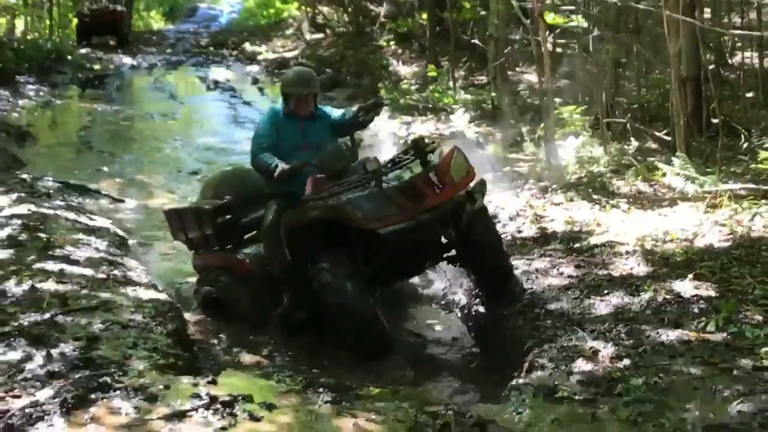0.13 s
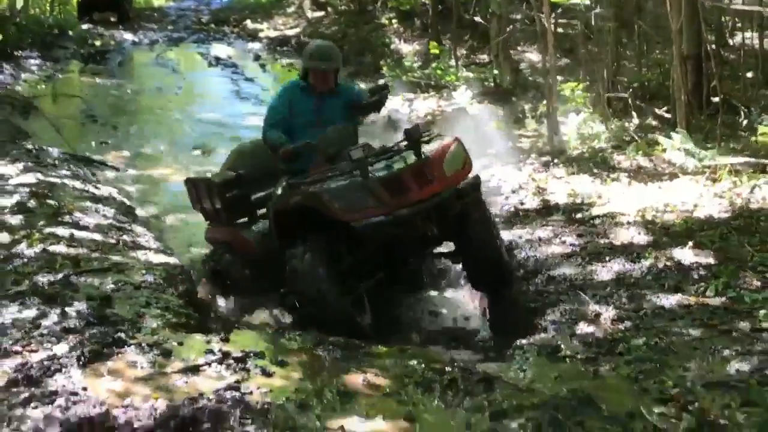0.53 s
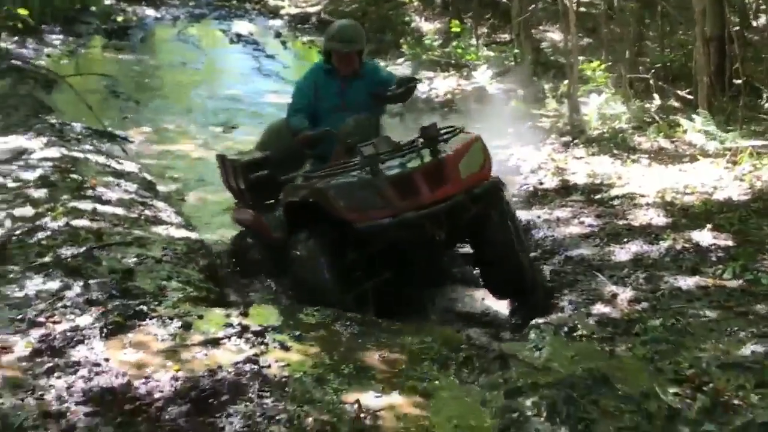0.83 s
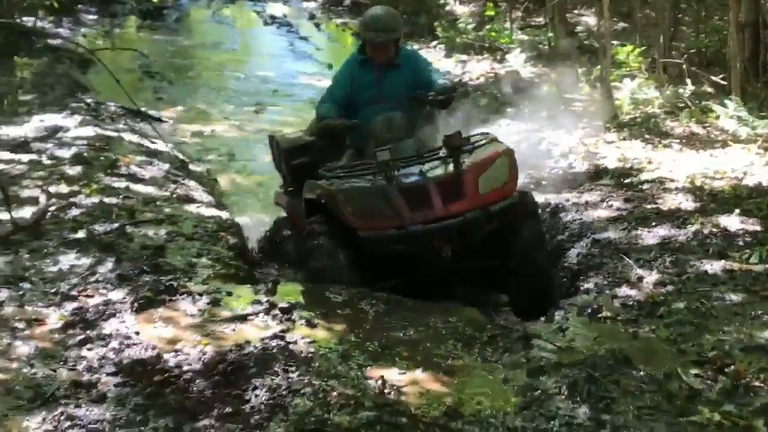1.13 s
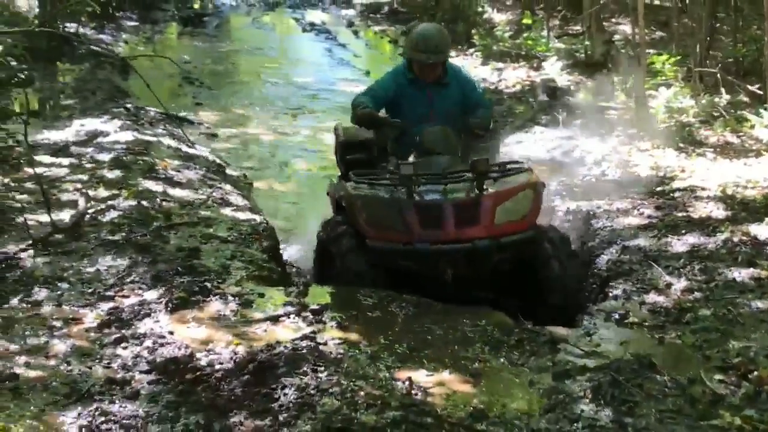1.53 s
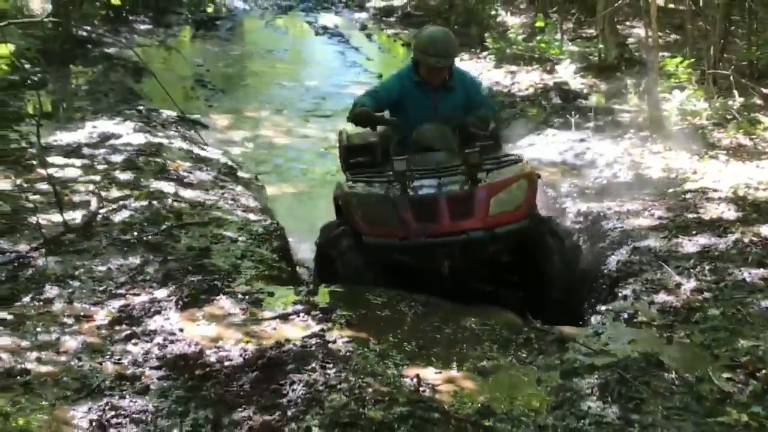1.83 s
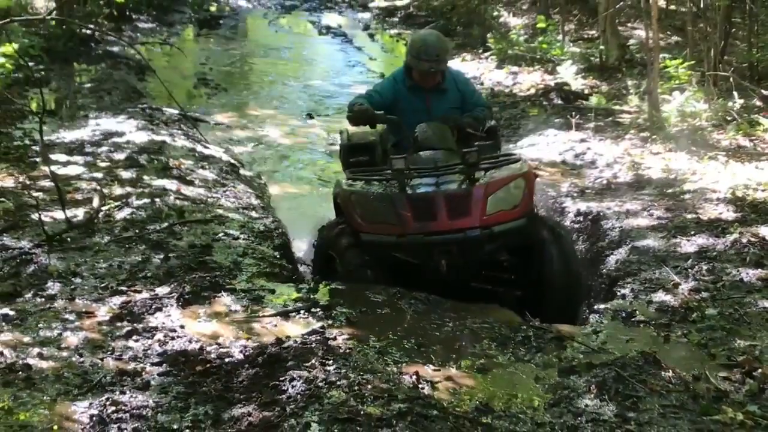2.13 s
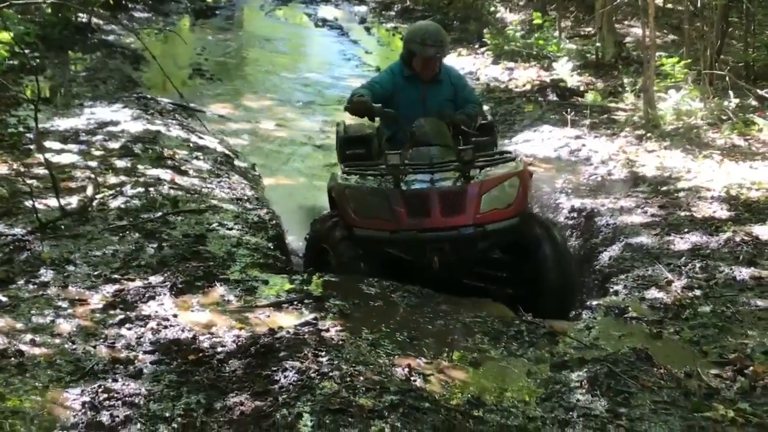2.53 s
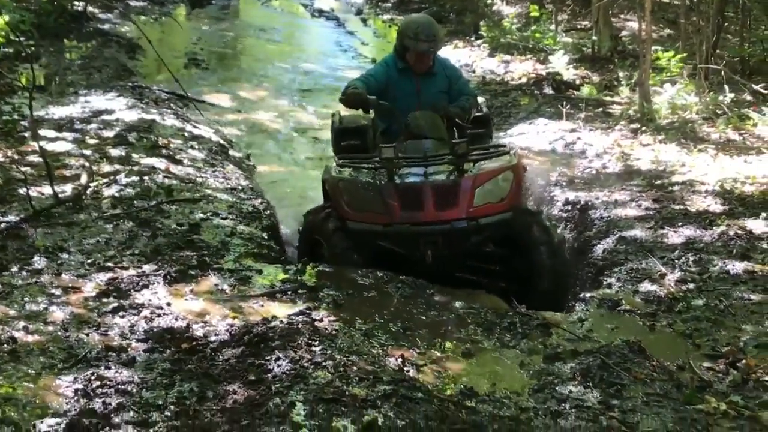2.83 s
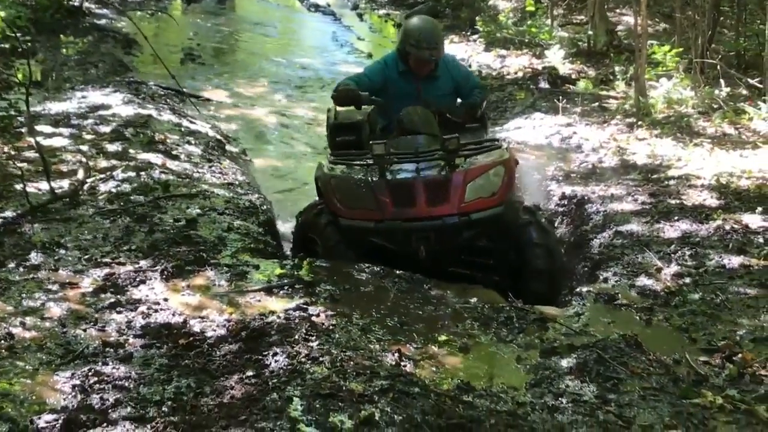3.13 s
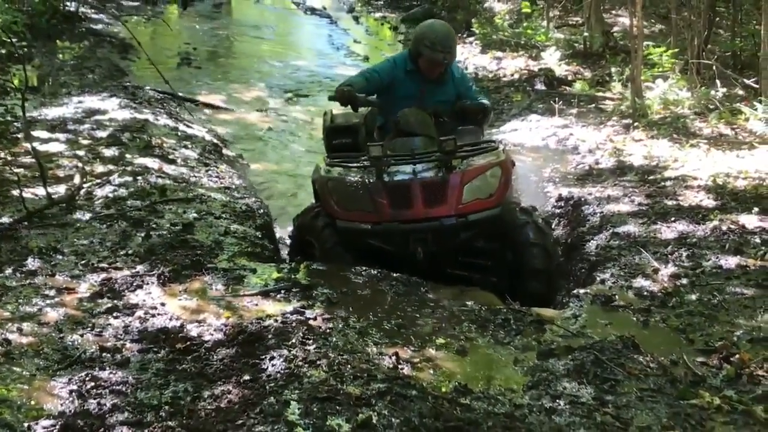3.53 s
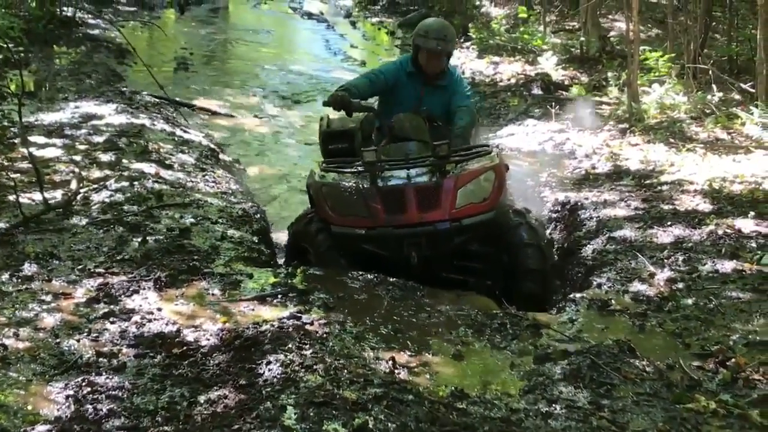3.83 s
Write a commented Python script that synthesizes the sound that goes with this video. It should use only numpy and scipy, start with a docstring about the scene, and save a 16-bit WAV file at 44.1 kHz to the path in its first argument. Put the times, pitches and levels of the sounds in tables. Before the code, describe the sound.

A quad bike engine labours low in mud, revs up once, then drops to a lumpy idle.

```python
"""In the woods, a single-cylinder quad bike labours out of a mud hole, revs up once and drops to a lumpy idle.
A steady note is built from harmonics of the firing rate, phase-shifted by the pipe's resonance.
Intake gulps and exhaust puffs excite damped modes: boom and bark, strongest at idle, and the air-box growl.
Noise puffs rasp above the growl; popping firings mark the idle. Filtered noise makes clatter and churned
water hiss, a few splashes of mud, and a low shudder of frame and mud."""
import sys
import numpy as np
from scipy import signal
from scipy.io import wavfile
from scipy.ndimage import uniform_filter1d

SR = 44100
rng = np.random.default_rng(int(sys.argv[2]) if len(sys.argv) > 2 else 0)


def log_audio(samples):
    """Write samples as a 16-bit WAV file to the path given in sys.argv[1]."""
    # one column per channel
    frames = np.atleast_2d(samples).T
    # limit to full scale, then quantise
    limited = np.clip(frames, -1, 1)
    pcm = np.round(limited * 32767).astype(np.int16)
    wavfile.write(sys.argv[1], SR, pcm)


N = 175077  # samples

# engine speed: (time [s], firing rate [1/s])
FIRING_RATE = [(0, 27.1), (.2, 28.4), (.42, 29.3), (.57, 28.1), (.72, 26.8), (.96, 27.3), (1.07, 24.5),
               (1.2, 21.0), (1.45, 19.8), (1.56, 19.6), (1.66, 25.1), (1.75, 29.6), (1.9, 30.8),
               (2.03, 32.4), (2.14, 35.4), (2.25, 38.2), (2.36, 40.4), (2.49, 41.8), (2.6, 36.6),
               (2.75, 29.3), (2.91, 22.7), (3.1, 18.8), (3.35, 16.0), (3.6, 15.0), (3.97, 14.5)]


def amp(db):
    """Decibel law: level [dB] to amplitude ratio."""
    return 10 ** (np.asarray(db) / 20)


def even(x):
    """Normalization to unit root-mean-square."""
    return x / np.sqrt(np.mean(x ** 2) + 1e-20)


def smooth_twice(x, size):
    """Low-pass smoothing by two moving averages in cascade, size in samples."""
    return uniform_filter1d(uniform_filter1d(x, size=size), size=size)


def steady(x):
    """Envelope division: removes the slow level, so that a level curve alone sets it."""
    return x / np.sqrt(smooth_twice(x ** 2, 6000) + 1e-12)


def curve(times, values):
    """Linear interpolation of breakpoints [s] to one value per sample."""
    return np.interp(np.arange(N) / SR, times, values)


def control(column):
    """Amplitude envelope of one engine layer [dB], interpolated linearly in level."""
    # layer levels before trims: (time [s], exhaust boom [dB], growl [dB], rasp [dB], clatter and spray [dB])
    layer_levels = np.array([(0, -49, -48, -36, -41), (.15, -48, -33.5, -34, -40),
                             (.33, -44, -32, -36.5, -37.5), (.75, -40, -41, -35.5, -39),
                             (1, -31, -38, -35, -39), (1.25, -32.5, -43, -42.5, -40),
                             (1.4, -27.5, -68, -39, -42.5), (1.615, -27, -51, -42.5, -42),
                             (1.635, -37, -32.5, -34, -41), (1.98, -49, -29.5, -30, -39.5),
                             (2.18, -37, -29, -29.5, -34.5), (2.43, -36, -29, -26, -35.5),
                             (2.515, -45, -32.5, -27.5, -35), (2.68, -46, -38, -35.5, -38.5),
                             (2.93, -19, -42, -41, -41.5), (3.12, -28, -50, -57, -42.5),
                             (3.27, -23.5, -52, -50, -45.5), (3.48, -29, -51.5, -43.5, -49.5),
                             (3.7, -27, -61, -43.5, -49.5), (3.78, -21.5, -56, -44.5, -53),
                             (3.97, -26.5, -53, -45, -54.5)])
    return curve(layer_levels[:, 0], layer_levels[:, column])


def ring(x, modes, order=1):
    """Modal superposition of damped resonators; a higher order gives steeper skirts and a softer attack."""
    out = 0
    for hz, width, db in modes:
        pole = np.exp((2j * np.pi * hz - np.pi * width) / SR)
        y = x + 0j
        for _ in range(order):
            y = signal.lfilter([1 - abs(pole)], [1, -pole], y)
        out = out + amp(db) * y.imag
    return out


def firings():
    """Phase accumulation: the integrated rate counts cycles and clicks each gulp and puff, unevenly when slow."""
    idle_hz, uneven_db, jitter_cycles = 17, 2.5, .035  # unevenness at the idle rate
    first_turn, exhaust_lag = .52, .33  # shares of a cycle: gone at the start; exhaust after intake
    rate = curve(*np.transpose(FIRING_RATE))
    slow = np.clip(idle_hz / rate, 0, 1.2) ** 3  # 1 at the idle rate, small at speed
    wobble = even(uniform_filter1d(rng.standard_normal(N), size=1500))
    turns = first_turn + np.cumsum(rate) / SR + jitter_cycles * slow * wobble
    # one random strength per cycle, for gulp and puff apart
    chance = rng.standard_normal((200, 2))[turns.astype(int)].T
    fire = []
    for lag in (0, exhaust_lag):
        count = np.maximum.accumulate(np.floor(turns - lag + 1))
        fire.append(np.diff(count, prepend=1) > 0)
    return turns, slow, fire * amp(uneven_db * slow * chance)


def rumble():
    """Resonant filtering of noise: the low shudder of frame and mud."""
    centre_hz, width_hz, level_db = 50, 50, -43
    return amp(level_db) * even(ring(rng.standard_normal(N), [(centre_hz, width_hz, 0)], order=2))


def hiss(turns):
    """Subtractive synthesis: clatter beating twice a cycle and fine spray drops, in patchy coloured noise."""
    # relative spectral density: (frequency [Hz], density [dB per Hz])
    hiss_spectrum = [(150, -29.5), (250, -4), (319, -23), (383, -2), (481, -12), (604, -3), (1230, -7),
                     (1530, -5.5), (2160, -17.5), (3210, -9.5), (4920, -18.5), (8630, -22.5), (9450, -33.5)]
    trim_db, beat_depth, spray_db, drops_per_s, patch_db = 5, .041, -17.5, 430, 1.9
    drop_sizes = amp(1.3 * np.minimum(rng.exponential(1, N), 5))
    landing = rng.random(N) < drops_per_s / SR
    drops = drop_sizes * landing * rng.choice([-1, 1], N)
    clatter = (1 + beat_depth * np.cos(4 * np.pi * turns)) * rng.standard_normal(N)
    noise = clatter + amp(spray_db) * even(drops)

    hz, _, z = signal.stft(noise, SR, nperseg=512)
    patches = uniform_filter1d(rng.standard_normal(z.shape), size=8, axis=0)  # across frequency
    patches = even(uniform_filter1d(patches, size=10, axis=1))  # across time
    f, db = np.transpose(hiss_spectrum)
    colour = np.interp(np.log(hz + 1), np.log(f), db, left=-60)[:, None]
    z = z * amp(colour + patch_db * patches)
    coloured = signal.istft(z, SR, nperseg=512)[1][:N]
    return amp(control(column=4) + trim_db) * even(coloured)


def splashes():
    """Transient excitation: each wet slap is a short noise burst resonating around a pitch."""
    # splashes of mud: (time [s], peak level [dB], pitch [Hz], 60 dB decay time of the burst [s])
    mud_slaps = [(0.278, -27, 5940, 0.015), (0.296, -23.5, 4040, 0.02), (0.53, -15, 7040, 0.0098),
                 (0.712, -28.5, 5660, 0.029), (3.16, -23.5, 940, 0.063), (3.191, -30.5, 1300, 0.026)]
    out, t = np.zeros(N), np.arange(5000) / SR
    for s, db, hz, t60 in mud_slaps:
        attack = np.minimum(t / (0.26 * t60), 1)
        burst = rng.standard_normal(len(t)) * attack * amp(-60 * t / t60)
        # a narrow resonance over a broad one at the same pitch
        sound = ring(burst, [(hz, .13 * hz, 0), (hz, 1.2 * hz, -6)])
        out[round(s * SR):][:len(t)] += amp(db) * sound / abs(sound).max()
    return out


def settling(drive):
    """Change of resonator modes: the intake rings one way deep in the hole, another once the machine settles."""
    # air-box modes, nose deep in the hole: (frequency [Hz], width [Hz], gain [dB])
    modes_in_mud = [(444, 52, 8.5), (583, 99, 6)]
    # air-box modes after the machine settles: (frequency [Hz], width [Hz], gain [dB])
    modes_clear = [(397.7, 37, 3), (540, 42, -1), (638, 155, -7), (739, 38, -5), (1046, 127, -10)]
    settled_s = 1.4
    in_mud, clear = ring(drive, modes_in_mud, order=2), ring(drive, modes_clear, order=2)
    return np.where(np.arange(N) < settled_s * SR, in_mud, clear)


def rasp(turns, clicks):
    """Forced resonance: gulps and softer puffs ring the air box in a pitched growl; noise puffs rasp above it."""
    # resonances of the rasping noise: (frequency [Hz], width [Hz], gain [dB])
    rasp_modes = [(680, 160, 11.5), (916, 170, 5.5), (1040, 190, -6.5), (1345, 410, 4), (1507, 88, 5.5)]
    second_rap, growl_noise, gulp_in_rasp = .3, .25, .25  # amplitude shares
    decay_cycles, steady_share, trim_db = .4, .4, -2.5
    puff_envelope = steady_share + np.exp(-(turns % 1) / decay_cycles)
    puffs = even(puff_envelope * rng.standard_normal(N))
    drive = even(clicks[0] + second_rap * clicks[1]) + growl_noise * puffs
    growl = amp(control(column=2) + trim_db) * steady(settling(drive))
    noisy = ring(puffs + gulp_in_rasp * even(clicks[0]), rasp_modes)
    return growl + amp(control(column=3) + trim_db) * steady(noisy)


def exhaust(slow, clicks):
    """Impulse excitation of pipe modes: loose exhaust boom and intake bark take over at idle, with pops."""
    # exhaust modes: (frequency [Hz], width [Hz], gain [dB])
    boom_modes = [(103.6, 21.7, 0), (63.6, 6.6, -4)]
    # intake modes: (frequency [Hz], width [Hz], gain [dB])
    bark_modes = [(155, 120, 0), (240, 50, -19)]
    # late firings that pop at idle: (time [s], peak level [dB])
    late_pops = [(3.133, -17), (3.232, -12.5), (3.302, -23), (3.532, -16), (3.668, -15.5), (3.955, -24.5)]
    # resonances of a pop: (frequency [Hz], width [Hz], gain [dB])
    pop_modes = [(111, 81, 5.5), (208, 43, -3)]
    rough, slow_noise, bark_db = .08, .2, -10  # air noise at any speed, more when slow; bark below boom [dB]
    gulp, puff = [even(c) + (rough + slow_noise * slow) * rng.standard_normal(N) for c in clicks]
    boom = steady(ring(puff, boom_modes, order=2))
    bark = steady(ring(gulp, bark_modes, order=3))
    out = amp(control(column=1)) * (boom + amp(bark_db) * bark)
    pop = ring(np.eye(1, 4000)[0], pop_modes, order=2)  # response to a single impulse
    for s, db in late_pops:
        part = out[round(s * SR):][:4000]
        part += (amp(db) * pop / abs(pop).max())[:len(part)]
    return out


def note(turns):
    """Additive synthesis: each harmonic of the firing rate lags by the phase of the pipe's resonance."""
    # (time [s], then level [dB] of 2, 3, 4, 5 and 6 times the firing rate)
    harmonic_levels = np.array([(0, -34, -38, -26, -21, -26), (.25, -31, -38, -20.5, -21, -30),
                                (.5, -33, -40, -21, -25, -31.5), (.75, -30, -38, -25, -22, -28.5),
                                (1.03, -33, -38, -26, -25, -31), (1.17, -37, -38, -36, -23, -40),
                                (1.34, -40, -39, -33, -25, -29), (1.5, -39, -35, -34, -24, -23),
                                (1.63, -31, -34, -34, -18.5, -27), (1.75, -29, -32, -22, -23, -31),
                                (2.04, -28, -28, -23, -23, -29), (2.21, -22, -24, -27, -24, -31),
                                (2.36, -20, -19, -23, -25, -30), (2.515, -21, -21, -27, -28, -30),
                                (2.54, -30, -15, -18, -29, -38), (2.67, -30, -15, -21.5, -27, -34),
                                (2.77, -42, -23, -19, -33, -37), (2.9, -38, -34, -20.5, -27, -33),
                                (3.15, -80, -80, -80, -80, -80)])
    # wide open the pipe rings less: (time [s], resonance [Hz], stages of ringing)
    pipe_resonance = np.transpose([(1.03, 126, 2), (1.2, 108, 2), (1.6, 106, 2), (1.88, 118, 2),
                                   (1.93, 98, 1), (2.51, 98, 1), (2.535, 102, 2)])
    # 7 to 10 times the firing rate: one level each, relative to the sixth [dB]
    upper_levels = [-15, -14, -15.5, -21]
    first_db, waver_db, pipe_width_hz = -14, 1.2, 40  # the firing rate itself is relative to its double
    rate = curve(*np.transpose(FIRING_RATE))
    hz, stages = [curve(pipe_resonance[0], column) for column in pipe_resonance[1:]]
    middle = [curve(harmonic_levels[:, 0], db) for db in harmonic_levels[:, 1:].T]
    levels = [middle[0] + first_db] + middle + [middle[-1] + up for up in upper_levels]
    out = 0
    for k, db in enumerate(levels, 1):
        waver = waver_db * even(smooth_twice(rng.standard_normal(N), 1500))
        lag = stages * np.arctan2(k * rate * pipe_width_hz, hz ** 2 - (k * rate) ** 2)
        # the root of two turns an effective level into a sine's peak
        out = out - np.sqrt(2) * amp(db + waver) * np.sin(2 * np.pi * k * turns - lag)
    return out


def scene():
    """Linear superposition of all sources, the engine layers sharing one firing cycle."""
    turns, slow, clicks = firings()
    background = rumble() + hiss(turns) + splashes()
    engine = rasp(turns, clicks) + exhaust(slow, clicks) + note(turns)
    return (background + engine)[None]


def record(dry):
    """Band limiting: a zero-phase bass cut, then a linear-phase low-pass."""
    low_hz, edge_hz = 28, 9250
    cut = signal.filtfilt(*signal.butter(2, low_hz, "high", fs=SR), dry)
    low_pass = signal.firwin(511, edge_hz, window=("kaiser", 9), fs=SR)
    return signal.oaconvolve(cut, low_pass[None], "same")


dry = scene()
out = record(dry)
log_audio(out)
```